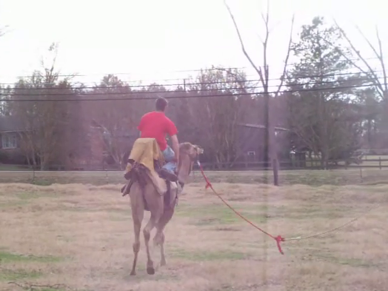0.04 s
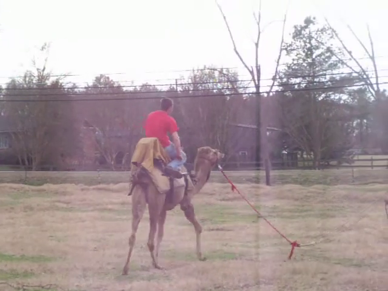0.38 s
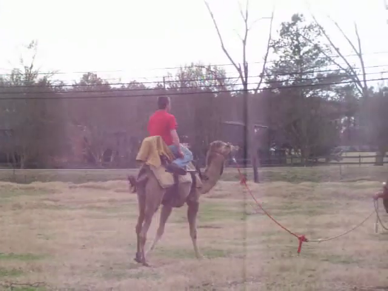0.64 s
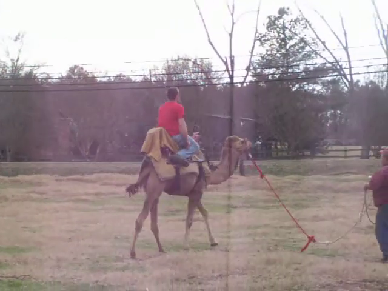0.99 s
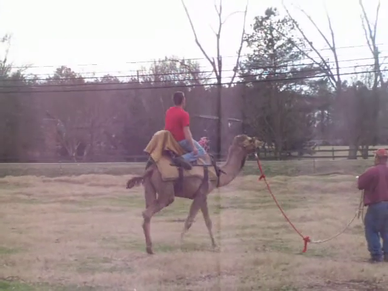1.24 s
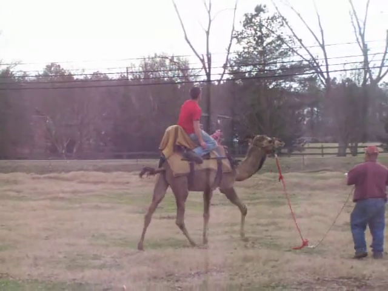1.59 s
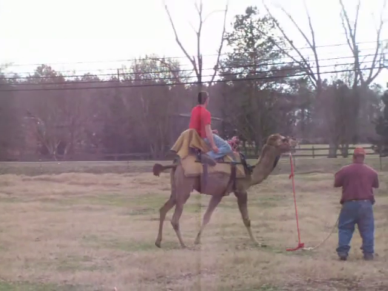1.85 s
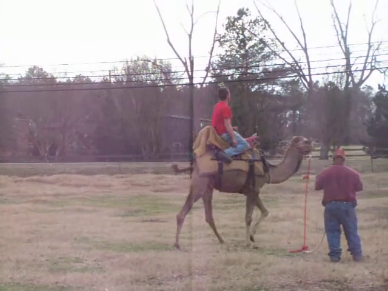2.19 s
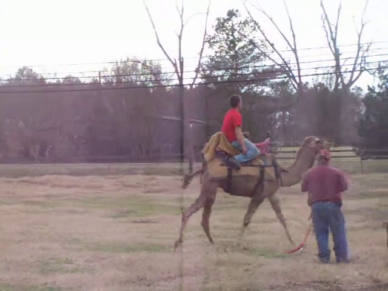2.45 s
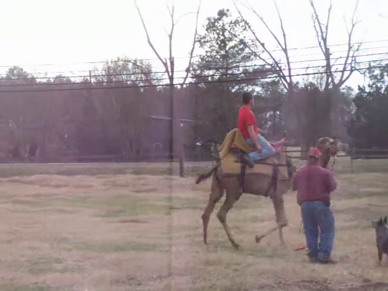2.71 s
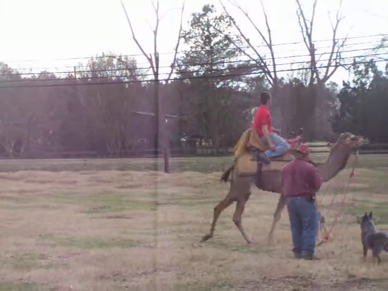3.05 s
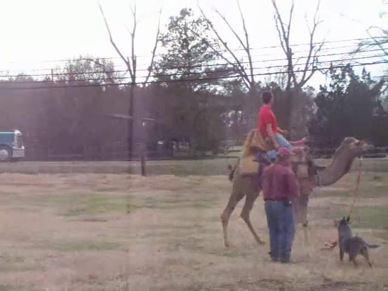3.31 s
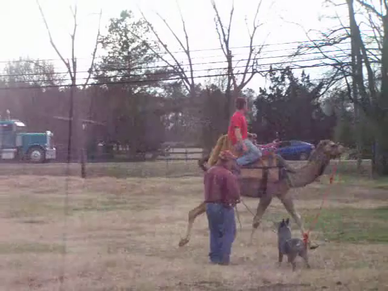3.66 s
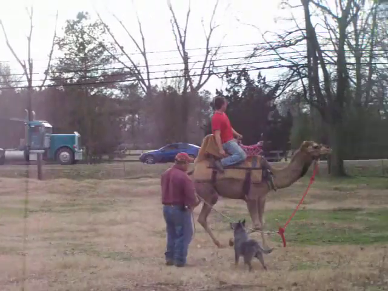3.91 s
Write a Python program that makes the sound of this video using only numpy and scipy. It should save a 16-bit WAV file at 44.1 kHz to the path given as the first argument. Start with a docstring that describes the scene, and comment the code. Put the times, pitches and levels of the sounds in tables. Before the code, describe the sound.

A diesel lorry accelerates along a road beyond an open field, over rumbling traffic and a second droning engine. A bird chirps once early on. Tyre roar swells, with a thin squeal midway, then hiss as the lorry nears.

```python
"""Diesel lorry beyond an open field

A lorry accelerates along a road, its exhaust harmonics climbing through fixed resonances, while a
second engine drones in the rumble of traffic. Tyre roar and hiss swell as the vehicles near.
Early on a bird chirps once and something ticks faintly; later a thin squeal rides on the roar."""
import sys
import numpy as np
from scipy import signal
from scipy.fft import rfft, irfft
from scipy.io import wavfile

SR = 44100
rng = np.random.default_rng(int(sys.argv[2]) if len(sys.argv) > 2 else 0)


def pcm_store(signal):
    """Save signal as 16-bit PCM."""
    levels = np.round(np.clip(np.atleast_2d(signal), -1, 1) * 32767)
    wavfile.write(sys.argv[1], SR, levels.astype(np.int16).T)


N = 176400
TIME_S = np.arange(N) / SR


def from_db(db):
    """Decibels to gain."""
    return 10 ** (np.asarray(db) / 20)


def envelopes(rows):
    """Breakpoints, with seconds first, become one curve for each further column."""
    times_s, *columns = np.transpose(rows)
    return [np.interp(TIME_S, times_s, column) for column in columns]


def coloured_noise(gain_at):
    """Noise shaped by a gain at each frequency, then scaled to unit rms."""
    hz = np.maximum(np.arange(N // 2 + 1) * SR / N, 1e-3)
    noise = irfft(rfft(rng.standard_normal(N)) * gain_at(hz), N)
    return noise / np.sqrt(np.mean(noise ** 2) + 1e-20)


def drift(rate_hz):
    """Random wander of unit rms, mostly slower than the given rate."""
    return coloured_noise(lambda hz: 1 / (1 + (hz / rate_hz) ** 2))


def swell(colour, level):
    """Noise of one colour that rides a level curve and wavers in the air."""
    points_hz, points_db = np.transpose(colour)
    noise = coloured_noise(
        lambda hz: from_db(np.interp(np.log(hz), np.log(points_hz), points_db, left=-70, right=-70)))
    level_db, = envelopes(level)
    gust_db = .71 * drift(rate_hz=8)
    return noise * from_db(level_db + gust_db)


def tone(pitch_hz, level_db):
    """A sine that follows a pitch and an rms level."""
    return np.sqrt(2) * from_db(level_db) * np.sin(2 * np.pi * np.cumsum(pitch_hz) / SR)


def crank_angle(speed_hz):
    """Angle in radians of a crankshaft that turns slightly unevenly."""
    jitter = .0015 * drift(rate_hz=12.7)
    return 2 * np.pi * np.cumsum(speed_hz * (1 + jitter)) / SR


def engine_order(angle, level_db):
    """One engine harmonic with a fluttering level."""
    flutter_db = 1.2 * drift(rate_hz=4)
    return np.sqrt(2) * from_db(level_db + flutter_db) * np.sin(angle + 2 * np.pi * rng.random())


def lorry():
    """Crankshaft orders bloom as they cross exhaust resonances; throb and rush pulse with the firing."""
    # crankshaft speeding up: time_s, speed_hz (turns a second)
    acceleration = [(0, 30.6), (.45, 29.8), (.7, 30), (1.0, 29.6), (1.3, 29.9), (1.5, 31.1), (1.75, 31.6),
                    (2.0, 31.8), (2.3, 33.1), (2.9, 35), (3.25, 36), (3.6, 37.4), (4, 38.4)]
    # exhaust fader: time_s, gain_db
    exhaust_fader = [(0, -2), (.2, -1.5), (.35, -9), (.7, -7), (1.1, -8), (1.55, -.5), (1.9, 0),
                     (2.15, -2.5), (2.9, -1), (3.7, -1), (4, -2)]
    # crankshaft orders from the second up: far_gain_db, near_gain_db
    orders = [(-12, 1), (3, 1), (-6, 3), (-12, 0), (0, -3), (-1, 1), (1, -2), (-1, -9), (2, -4)]
    # exhaust resonances: centre_hz, width_hz, far_peak_db, near_peak_db
    exhaust_modes = [(93, 18, -38, -38), (112.5, 7, -29, -28), (146, 25, -38.5, -37.5),
                     (176, 9, -26, -24.5), (189.5, 6, -28, -42), (254, 10, -32, -32), (264, 11, -31, -30.5),
                     (303, 16, -39, -48), (343, 16, -46, -46)]
    # Each noise has a colour (frequency_hz, relative_db) and a level (time_s, level_db).
    # low throb, growing as the lorry nears
    throb_colour = [(80, -24.5), (125, 2.5), (180, -1.5), (215, 1), (270, -10), (450, -24.5)]
    throb_level = [(1.2, -36.5), (2.1, -33.5), (3.0, -34.5), (4, -28)]
    # bright rush of the lorry in the second half
    rush_colour = [(300, -18), (500, -19), (720, -3), (900, -12), (1130, -0.5), (1600, -11.5),
                   (1900, -12.5), (2550, -12), (2850, 2), (3600, 0), (4500, -3), (5100, -4.5), (5600, -8.5),
                   (6100, -12.5), (7700, -23.5), (9000, -49.5)]
    rush_level = [(1.5, -66), (2.1, -32.5), (2.5, -31), (2.75, -26.5), (3.1, -27.7), (3.6, -27), (4, -26)]
    speed_hz, = envelopes(acceleration)
    fader_db, = envelopes(exhaust_fader)
    far_until_s, near_from_s = 1.85, 2.07
    nearness = np.interp(TIME_S, [far_until_s, near_from_s], [0, 1])
    resonances = [(hz, width, from_db(far_db + nearness * (near_db - far_db)))
                  for hz, width, far_db, near_db in exhaust_modes]
    angle = crank_angle(speed_hz)
    exhaust = 0
    for order, (far_db, near_db) in enumerate(orders, 2):
        power = sum(peak ** 2 / (1 + (2 * (order * speed_hz - hz) / width) ** 2)
                    for hz, width, peak in resonances)
        drive_db = fader_db + far_db + nearness * (near_db - far_db)
        exhaust += np.sqrt(power) * engine_order(order * angle, drive_db)
    firing_pulse = 1 + .17 * np.cos(3 * angle)  # three firings a turn
    return exhaust + (swell(throb_colour, throb_level) + swell(rush_colour, rush_level)) * firing_pulse


def second_engine():
    """A steady drone that fires twice a turn; its firing note dies away late on."""
    # near-constant running: time_s, speed_hz (turns a second), gain_db
    running = [(0, 43, -3), (.5, 42, -4), (.8, 41.5, -.5), (1.05, 41.2, -1), (1.5, 42, -1.5),
               (2.0, 42.5, -1), (2.5, 42.8, -1.5), (3.1, 43, -1), (3.4, 43.1, -6), (3.7, 43.2, 0),
               (4, 42.8, -1)]
    # crankshaft orders from the first up: level_db before that gain
    orders = [-55.5, -34.5, -42.5, -37.5, -51.5, -42.5, -55.5, -49.5]
    speed_hz, gain_db = envelopes(running)
    angle = crank_angle(speed_hz)
    fade_start_s, fade_db_per_s = 2.7, 37
    fade_db = fade_db_per_s * np.maximum(TIME_S - fade_start_s, 0)
    return sum(engine_order(order * angle, level_db + gain_db - fade_db * (order == 2))
               for order, level_db in enumerate(orders, 1))


def tyres():
    """Tyres rolling on the road: a roar, topped first by rasp and then by hiss."""
    # Each noise has a colour (frequency_hz, relative_db) and a level (time_s, level_db).
    # midrange roar of tyre and road
    roar_colour = [(350, -7), (520, -15.5), (700, -6.5), (920, -10), (1130, -3.5), (1380, -0.5),
                   (1680, -6.5), (1880, 1), (2300, -0.5), (2600, -3.5), (3000, -5.5), (4000, -19)]
    roar_level = [(0, -45), (.6, -41), (1.0, -31), (1.2, -29), (1.43, -27), (1.7, -30.5), (2.12, -27.5),
                  (2.3, -31.5), (2.5, -30), (2.8, -29), (3.15, -26.5), (3.6, -27.5), (4, -28)]
    # rasp on the first swell
    rasp_colour = [(1700, -28.5), (2500, -2.5), (3100, -0.5), (3600, 0.5), (3900, -6), (4300, -5.5),
                   (4750, -11.5), (5400, -11), (6100, -14), (7000, -23), (8500, -42)]
    rasp_level = [(0, -62.5), (.6, -41.5), (1.1, -33.5), (1.4, -28), (1.65, -27.5), (1.9, -27.5),
                  (2.2, -28), (2.5, -45), (3, -41)]
    # bright hiss of the lorry's tyres as it comes into the open
    hiss_colour = [(2600, -18), (3700, -1), (4900, 0), (5800, -13), (7500, -28)]
    hiss_level = [(2.95, -57), (3.15, -38), (3.38, -34.5), (3.55, -40), (3.9, -35)]
    return swell(roar_colour, roar_level) + swell(rasp_colour, rasp_level) + swell(hiss_colour, hiss_level)


def traffic():
    """An unbroken bed of low rumble and far-off vehicles."""
    # Each noise has a colour (frequency_hz, relative_db) and a level (time_s, level_db).
    # low rumble
    rumble_colour = [(20, -23.5), (35, -10.5), (52, -2), (75, -1.5), (105, 1.5), (150, -1), (190, 2),
                     (240, -3.5), (285, -3), (345, -5), (400, -16.5), (520, -25.5), (900, -48)]
    rumble_level = [(0, -32.5), (.4, -33.5), (1.001, -33.5), (1.6, -29.5), (2.5, -29), (3.2, -32),
                    (4, -28.5)]
    # broad wash of far traffic
    far_colour = [(350, -22.5), (480, -9.5), (740, -0.5), (950, -4), (1330, 0.5), (2000, -1.5),
                  (3000, -2.5), (4000, -3.5), (5000, -9.5), (6000, -14), (7000, -20.5), (8200, -31.5),
                  (9000, -54)]
    far_level = [(0, -28), (.4, -30), (.7, -29.5), (1.4, -28.5)]
    return swell(rumble_colour, rumble_level) + swell(far_colour, far_level)


def bird():
    """One clean note that rises in two steps."""
    # the chirp's contour: time_s, pitch_hz, level_db
    chirp = [(.335, 3780, -120), (.35, 3860, -44), (.38, 4025, -35.5), (.402, 4025, -39),
             (.43, 4150, -37.5), (.48, 4200, -120)]
    return tone(*envelopes(chirp))


def tick():
    """Two high modes ring briefly, fading softly in and out."""
    # ringing modes: pitch_hz, level_db
    modes = [(7354, -50), (8660, -69)]
    centre_s, length_s = .65, .026
    window = np.cos(np.pi * np.clip((TIME_S - centre_s) / length_s, -.5, .5))
    return window * sum(tone(np.full(N, pitch_hz), level_db) for pitch_hz, level_db in modes)


def squeal():
    """A thin, unsteady tone that creeps up in pitch over three swells."""
    # the squeal's contour: time_s, pitch_hz, level_db
    contour = [(1.55, 2910, -90), (1.7, 2920, -40), (1.9, 2930, -33.5), (1.97, 2935, -44),
               (2.04, 2938, -41), (2.1, 2945, -29.5), (2.2, 2965, -34), (2.27, 2952, -35),
               (2.37, 2963, -30.5), (2.43, 2966, -39), (2.7, 2966, -90)]
    pitch_hz, level_db = envelopes(contour)
    return tone(pitch_hz + 4 * drift(rate_hz=40), level_db + 1.2 * drift(rate_hz=25))


def scene():
    """Everything reaches one small microphone, alike in both channels."""
    mono = lorry() + second_engine() + tyres() + traffic() + bird() + tick() + squeal()
    return np.array([mono, mono])


def record(dry):
    """A steep low-pass takes off the top end."""
    cutoff_hz = 8900
    return signal.sosfilt(signal.ellip(10, .1, 90, cutoff_hz, fs=SR, output="sos"), dry)


dry = scene()
out = record(dry)
pcm_store(out)
```